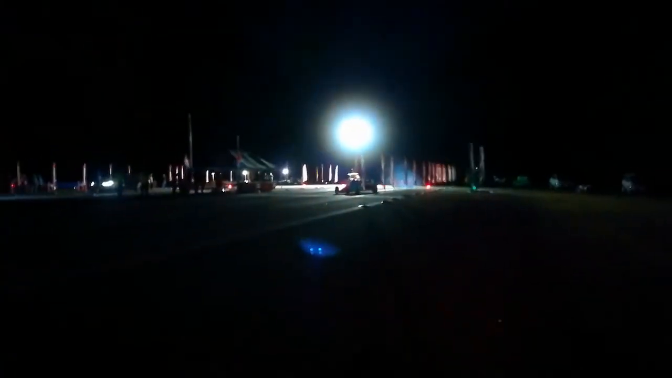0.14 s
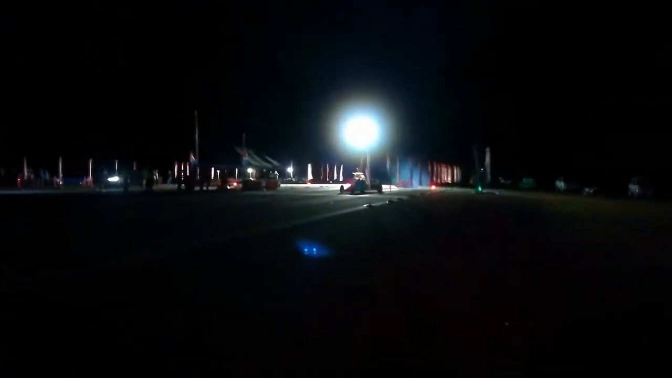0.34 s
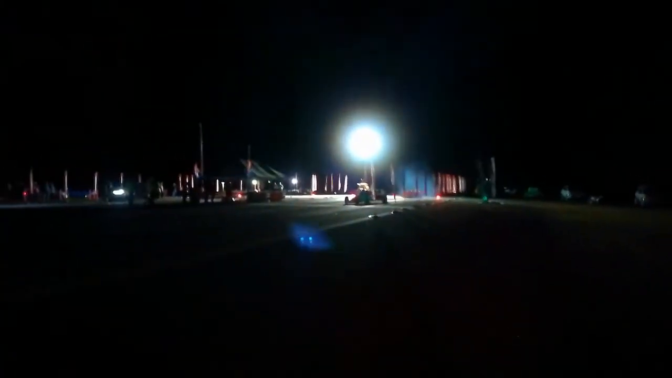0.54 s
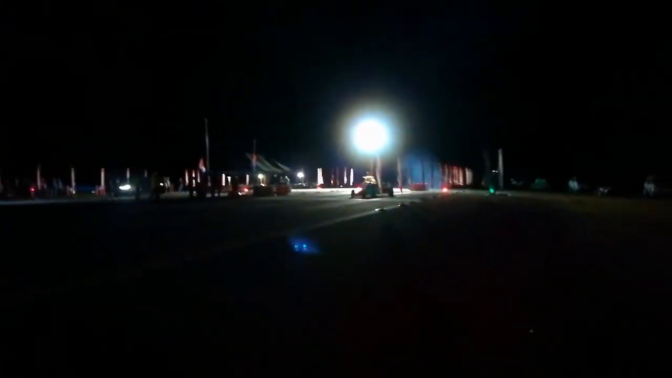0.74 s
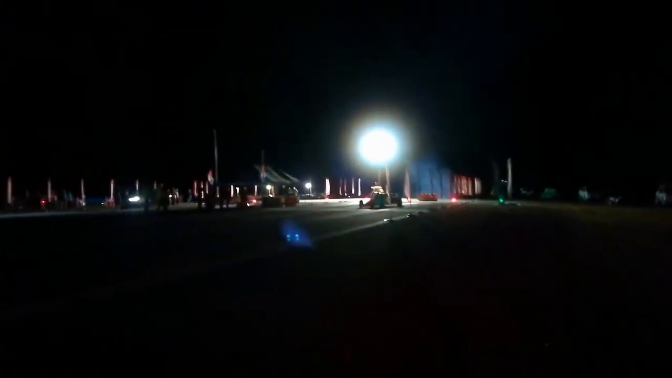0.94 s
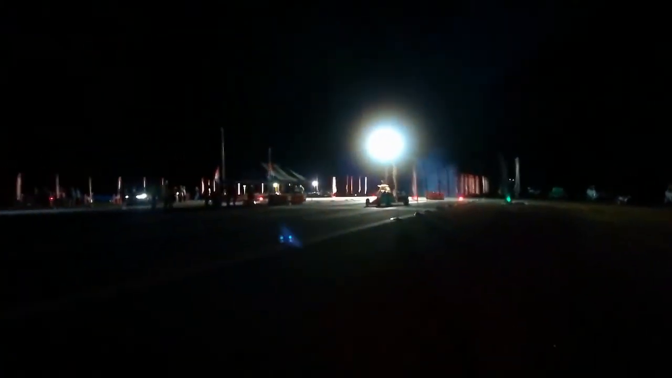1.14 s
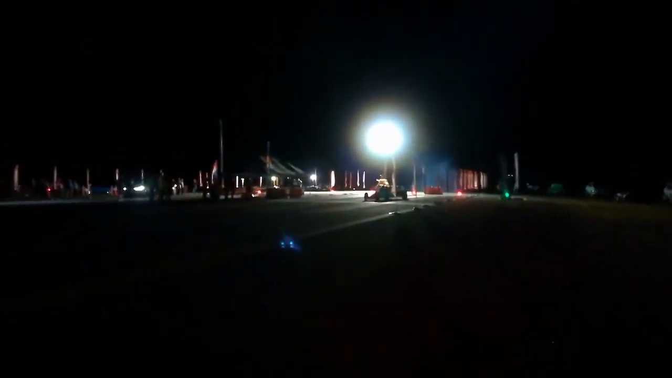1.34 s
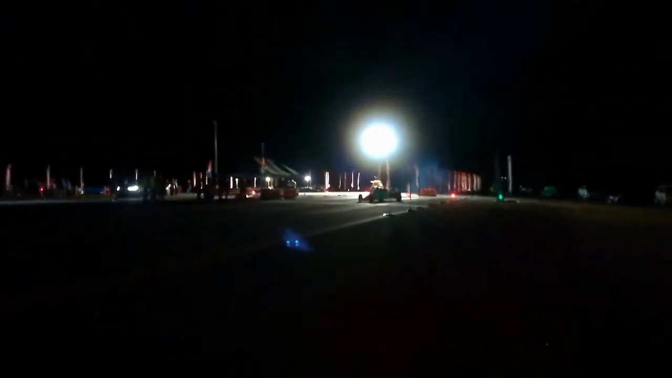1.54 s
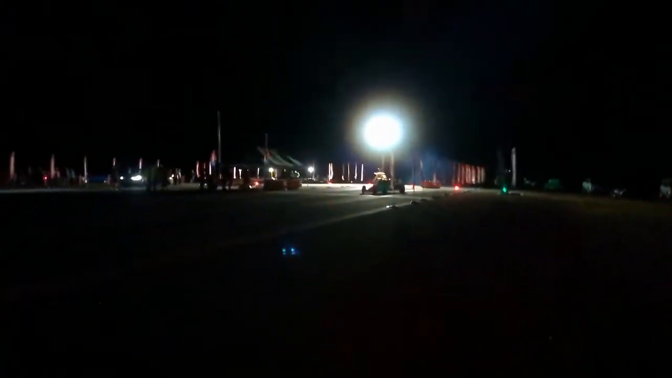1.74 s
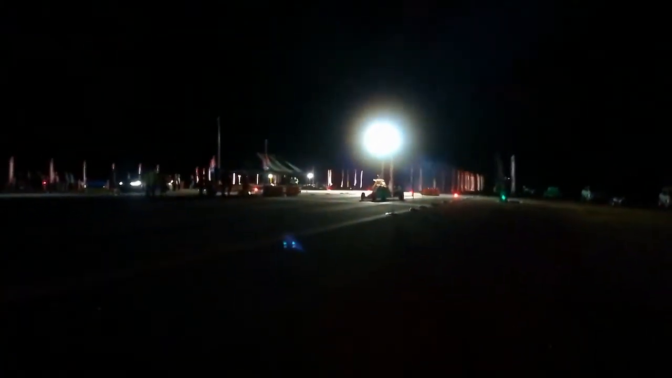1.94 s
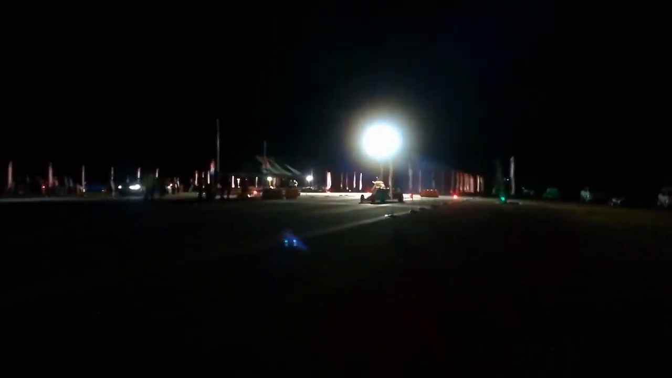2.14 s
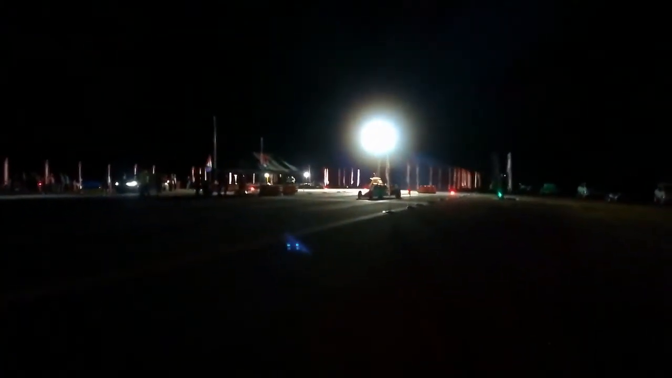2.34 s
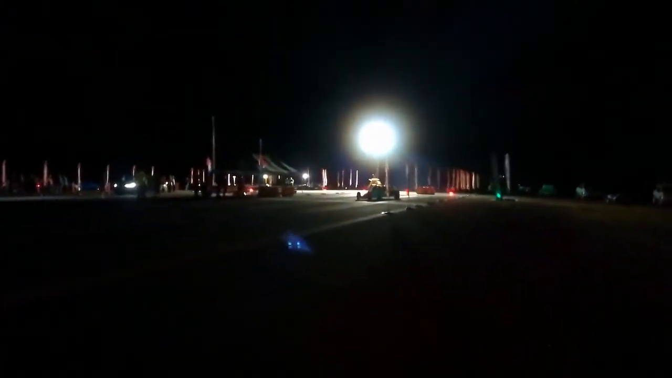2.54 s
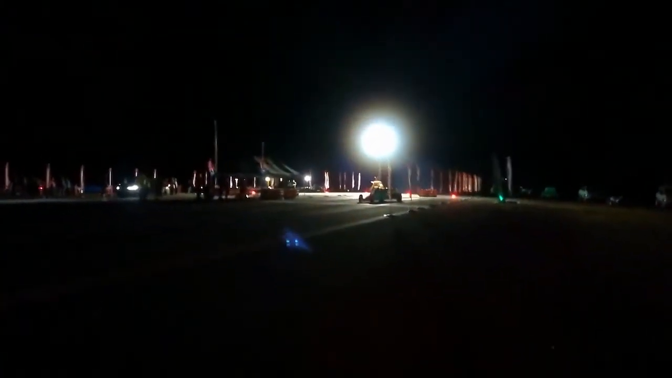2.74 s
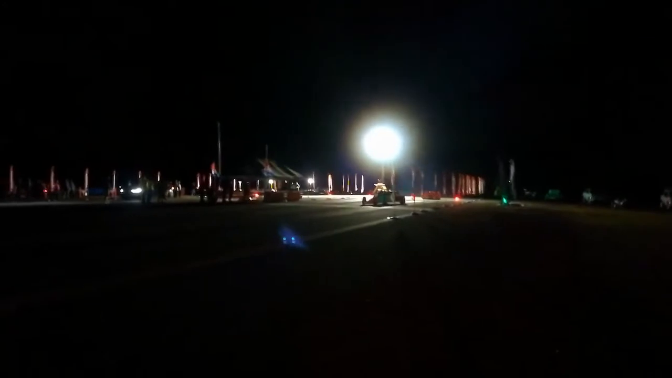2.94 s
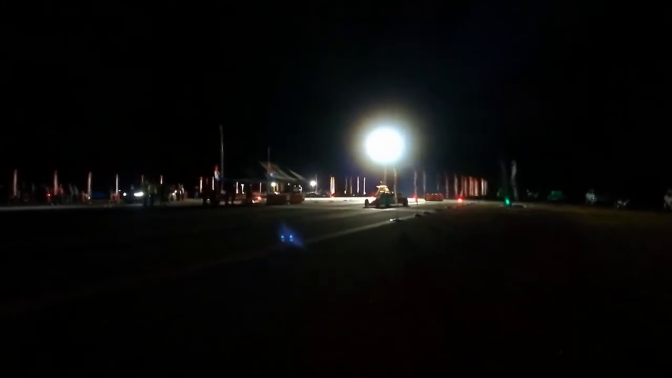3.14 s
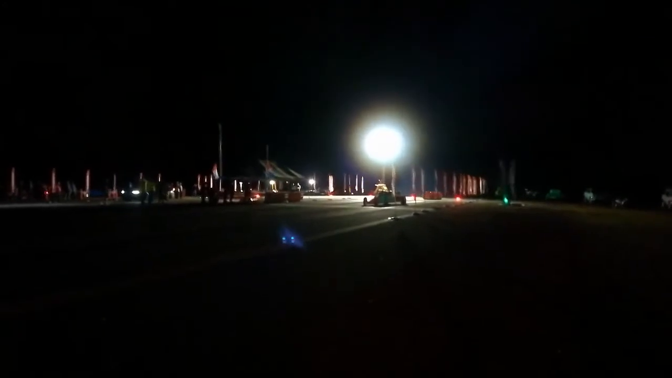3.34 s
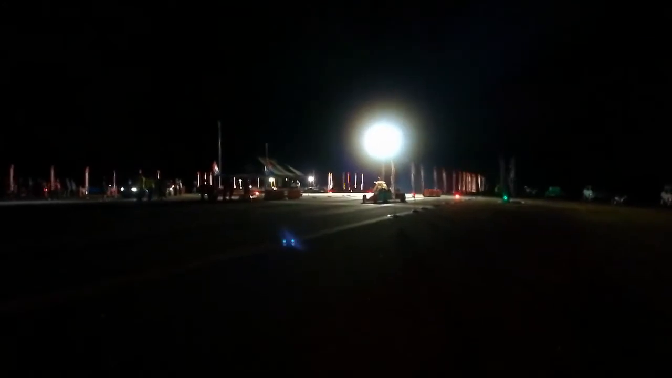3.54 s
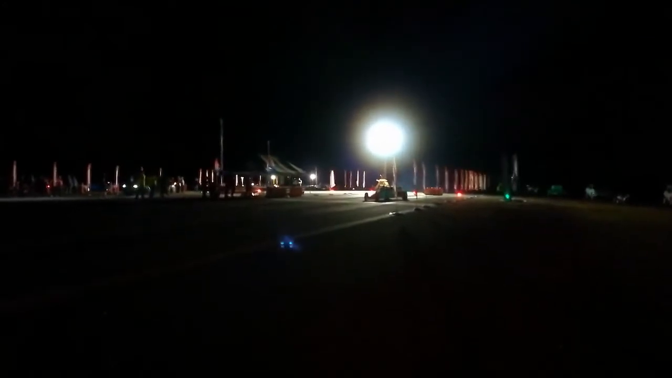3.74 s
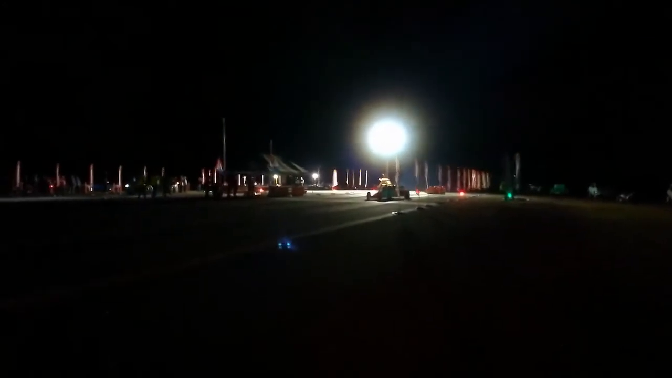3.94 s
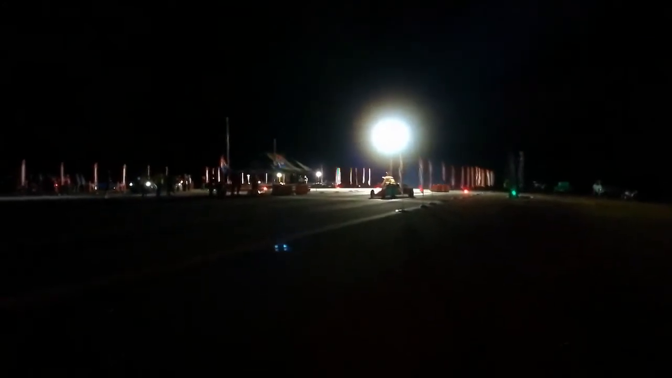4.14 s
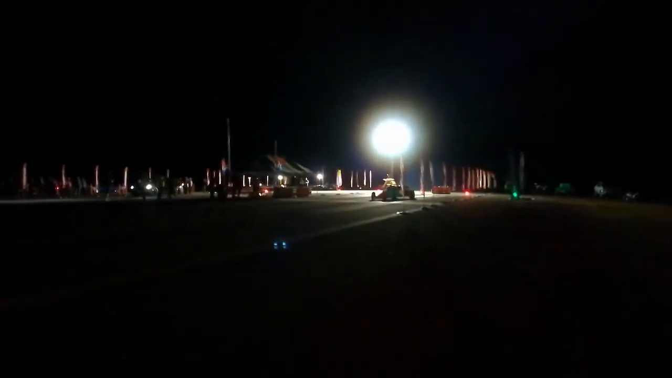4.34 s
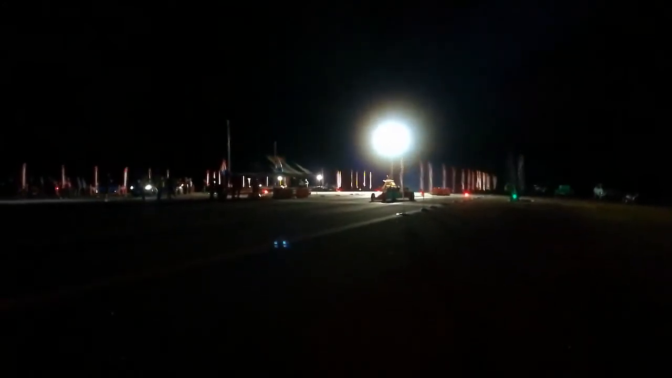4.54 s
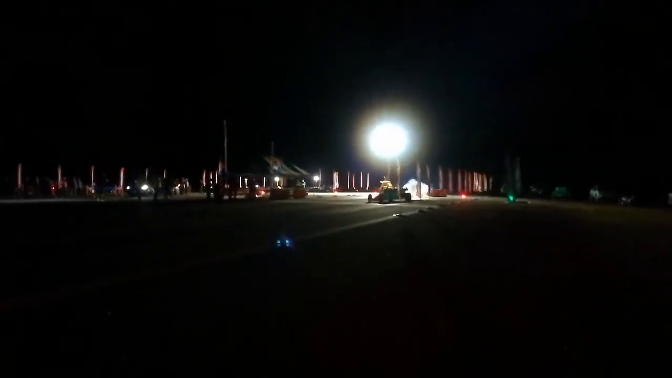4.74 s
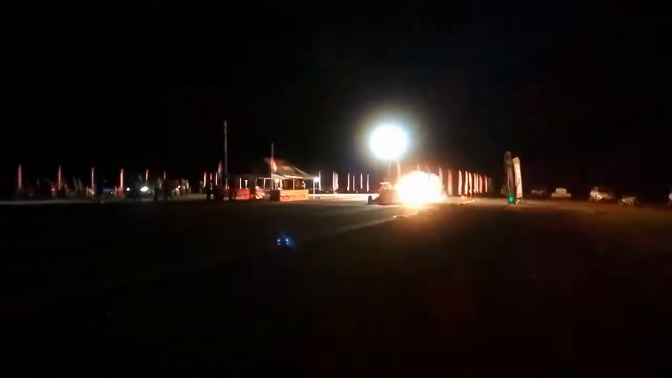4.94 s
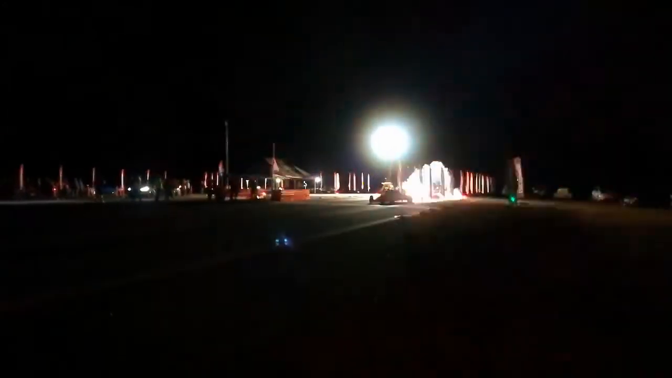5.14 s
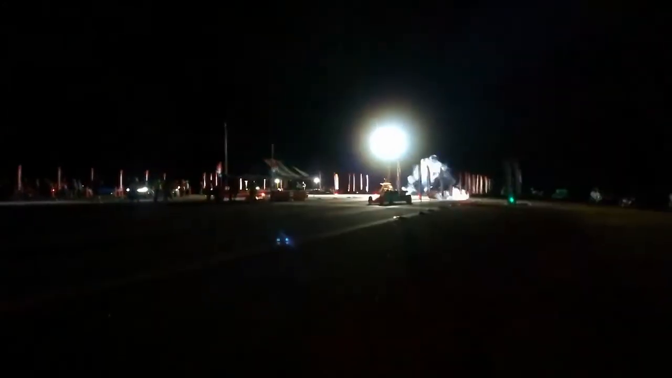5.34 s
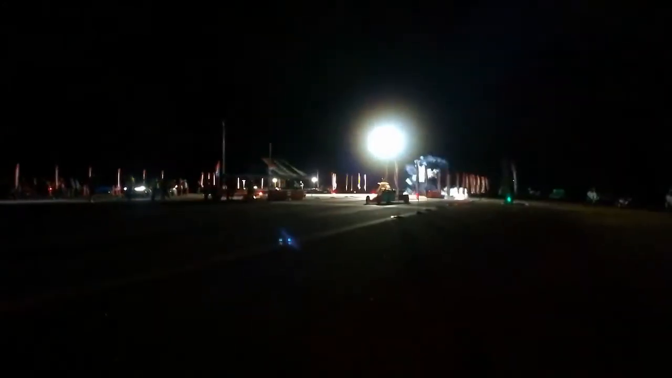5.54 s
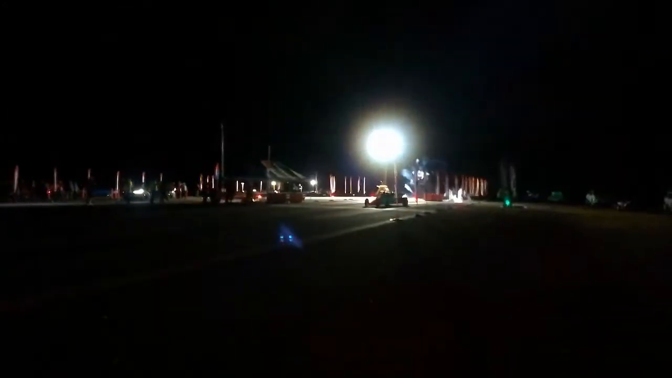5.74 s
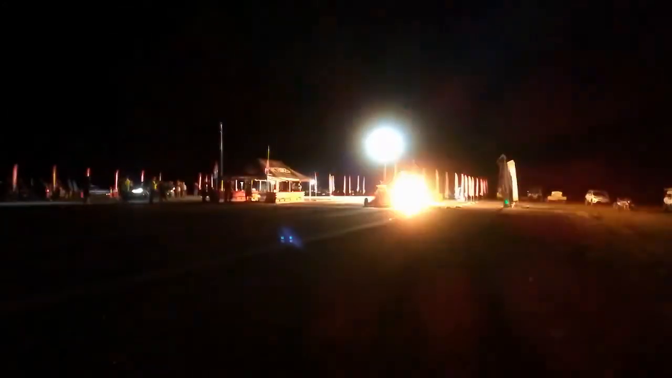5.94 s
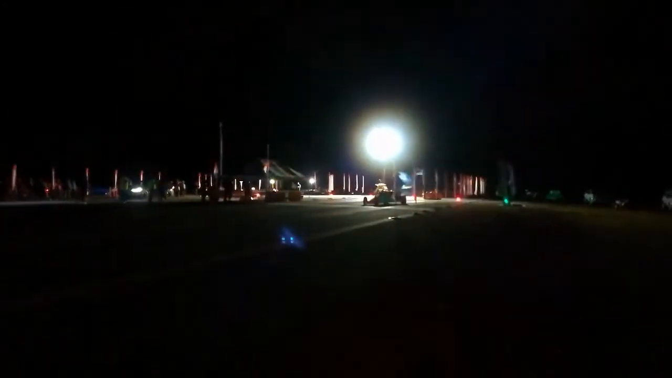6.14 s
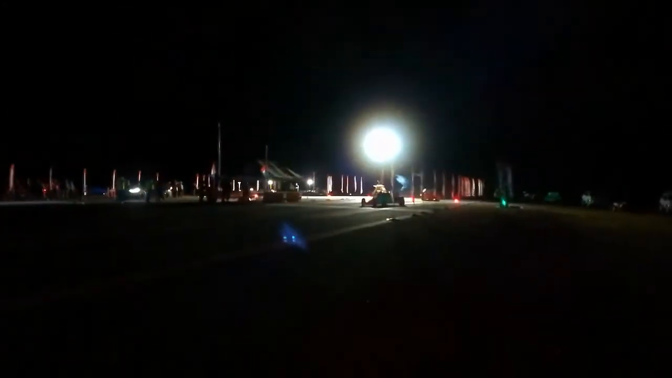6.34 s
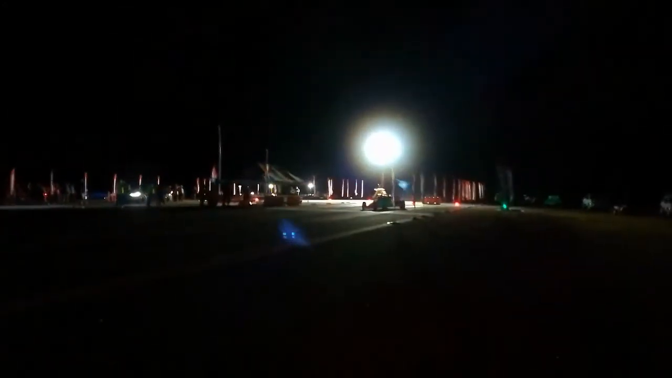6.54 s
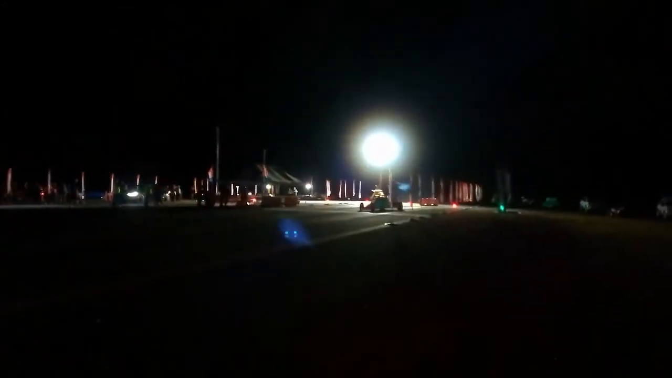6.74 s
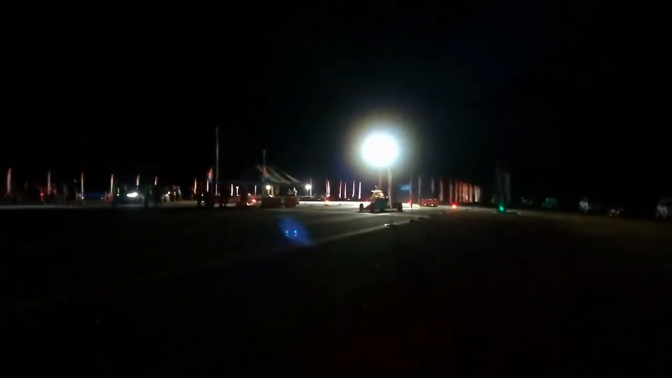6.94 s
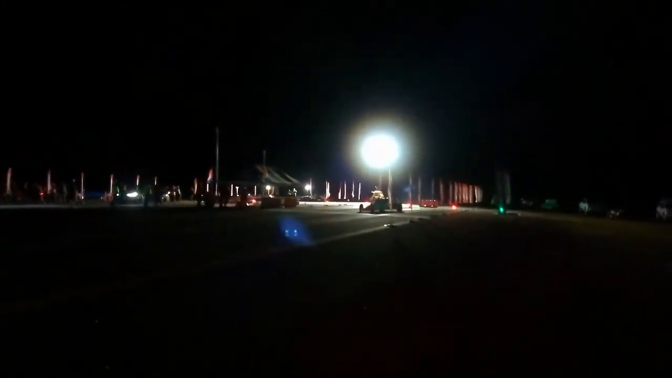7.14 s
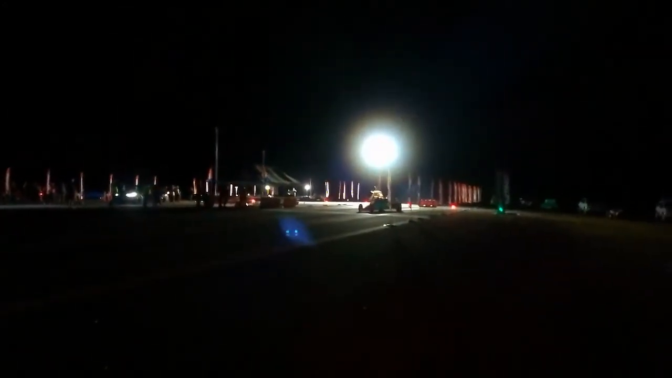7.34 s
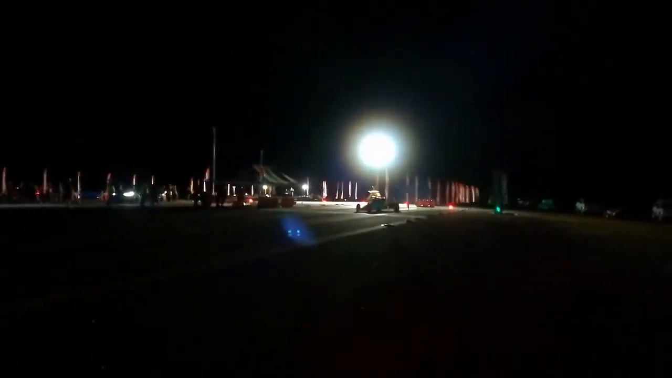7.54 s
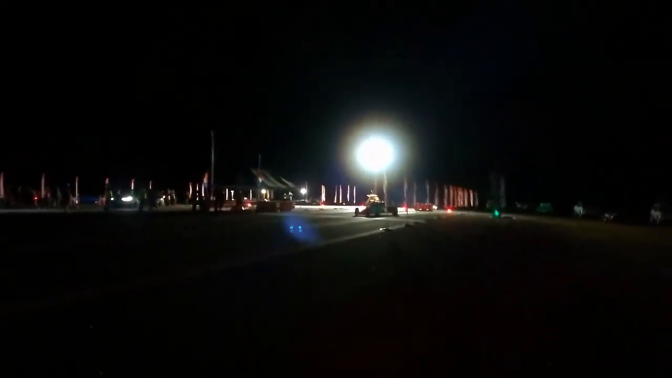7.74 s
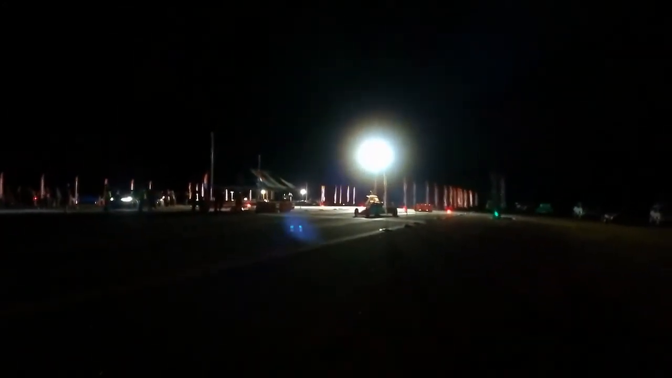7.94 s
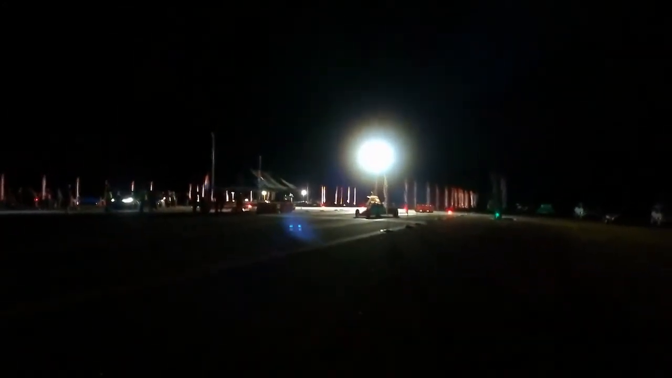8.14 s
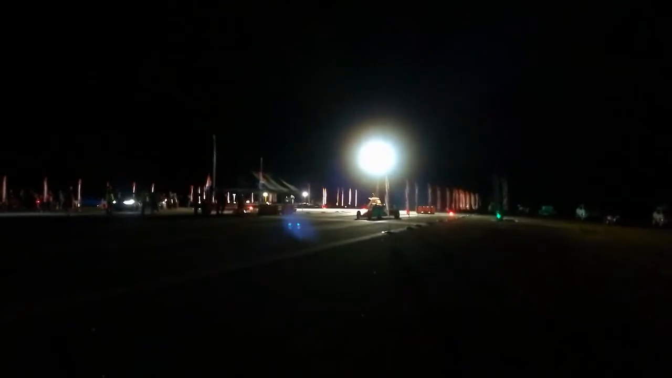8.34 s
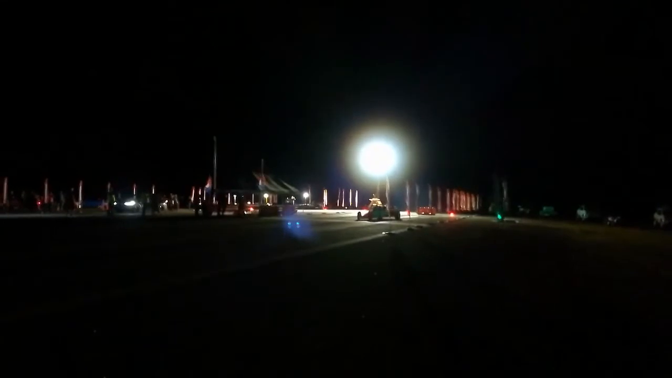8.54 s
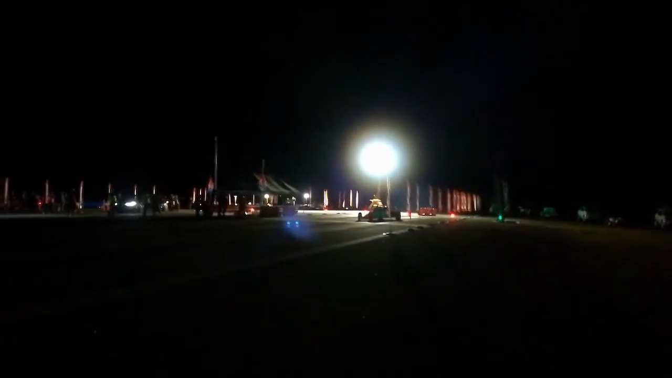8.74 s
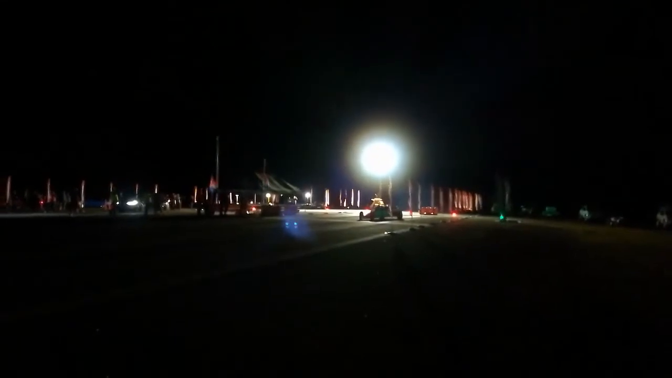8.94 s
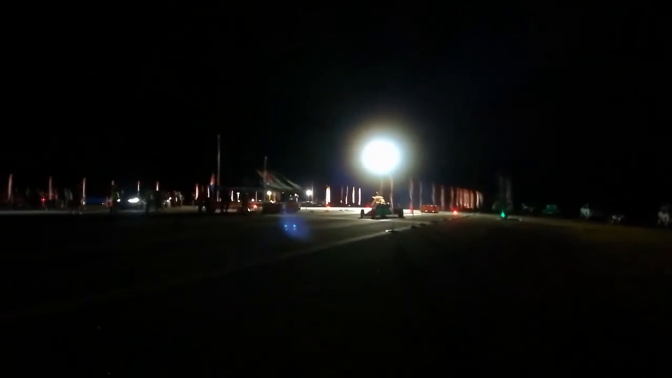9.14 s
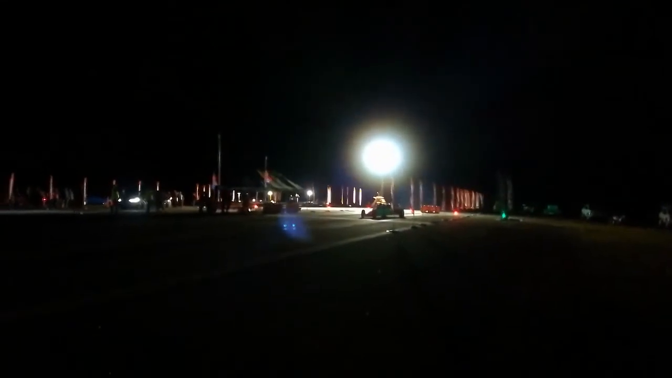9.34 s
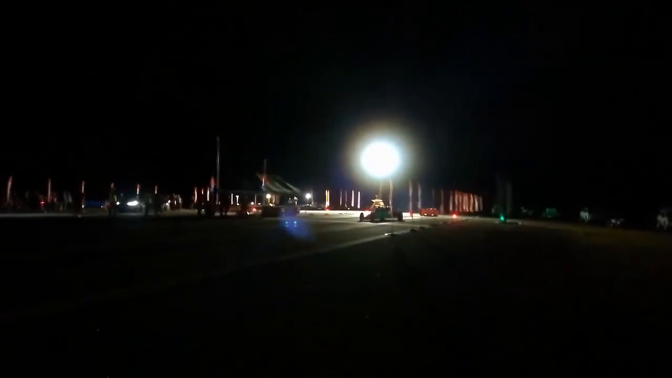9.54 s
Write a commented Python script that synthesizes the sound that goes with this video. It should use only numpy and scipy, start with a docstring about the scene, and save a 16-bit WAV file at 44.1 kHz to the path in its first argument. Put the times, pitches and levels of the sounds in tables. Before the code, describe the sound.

A jet-powered car idles throughout, heard from far off on an open drag strip. Its turbine makes a high, fluttering whine of several tones, with whistles coming and going over rushing air, hiss and a low exhaust rumble. From about 0.5 to 3 seconds the pitch creeps upward, then holds while the hiss swells. At 5 seconds the afterburner lights with a loud, ragged thump that briefly overloads the microphone, followed by a deep popping roar lasting a third of a second. A second, softer burst with pops comes at about 6 seconds. Each blast rolls away quickly and makes the whine dip slightly in pitch. The engine sounds a little quieter afterward. From 7 to nearly 9 seconds the whine climbs higher and regains its level, running on until the end, just short of 10 seconds.

```python
"""Turbine whine over intake rush, hiss and exhaust rumble: a jet car idles, far off on a night drag strip. The
throttle creeps up and down. Compressor blades sing on multiples of the shaft speed; intake swirl whistles near
certain speeds. Moving air makes the sound flicker. Twice the afterburner lights, burns and pops for about 0.3
s, and the shaft sags. The first shot opens with a ragged thump; the overall level ducks there and later
recovers."""
import sys
import numpy as np
from scipy import signal
from scipy.fft import rfft, irfft, next_fast_len
from scipy.io import wavfile
from scipy.ndimage import uniform_filter1d, map_coordinates

SR = 44100
rng = np.random.default_rng(int(sys.argv[2]) if len(sys.argv) > 2 else 0)


def int16_out(signal):
    """Quantize to a 16-bit WAV file."""
    q = np.round(np.clip(np.atleast_2d(signal).T, -1, 1) * 32767)
    wavfile.write(sys.argv[1], SR, q.astype(np.int16))


N = 427769
TIME_S = np.arange(N) / SR
IDLE_HZ, CRUISE_HZ = 113.96, 130  # shaft speeds

# throttle moves: start/s, length/s, shaft speed change/Hz
THROTTLE_MOVES = [(0.46, 0.84, 10.91), (1.36, 0.64, 2.22), (2.08, 0.77, 4.24), (3.32, 0.8, 0.94),
                  (3.82, 3.9, -1.52), (7.0, 0.63, 5.35), (7.87, 0.87, 7.29)]
# shaft speed grid of the three loudest blade rows: f/Hz
MAIN_SPEEDS_HZ = [114, 118, 123, 125, 127, 131, 132.3, 136.3, 140, 143.5]
# front, middle and rear rows on that grid: level/dB
FRONT_ROW_DB = [-31, -30, -37, -40, -29, -29, -28.5, -34, -46, -42]
MIDDLE_ROW_DB = [-39.5, -36, -36, -47, -39, -40.5, -37.5, -35.5, -34, -41]
REAR_ROW_DB = [-44, -40, -42, -32.5, -38, -36, -34, -35, -30, -28.5]
# shaft speed grid of the weaker blade tones: f/Hz
WEAK_SPEEDS_HZ = [114, 127, 132, 143]
# weaker blade tones: shaft multiple, then level/dB at each grid speed
WEAK_TONES = [(17, -43, -47.5, -50, -38.5), (23, -60, -57, -42, -48.5), (25, -43.5, -35.5, -41, -43),
              (28, -57, -52, -41, -41.5), (30, -60, -47, -43, -51), (31, -60, -52, -43, -45),
              (37, -56, -42, -41, -35.5), (40, -43, -40, -38.5, -56), (42, -43, -41, -49, -54),
              (45, -60, -48, -49, -42), (48, -59, -52, -49, -39.5), (51, -46, -35, -40, -52),
              (54, -38.5, -47, -46, -47), (59, -60, -56, -61, -43), (60, -56, -43, -59, -47)]
# whistles: best shaft speed/Hz, reach either side/Hz, f/Hz, glide/(Hz per shaft Hz), width/Hz, level/dB
INTAKE_WHISTLES = [(114, 5, 815, -0.5, 6.1, -44.5), (113.7, 6, 898, 1, 22, -41.5),
                   (125.9, 5.65, 1031, 12, 30, -38.5), (127.3, 2.9, 950, 11, 6, -47),
                   (132, 1.5, 1015, 20, 8, -47), (132.4, 1.3, 920, 8, 6, -50), (127, 2.8, 1335, 16, 8, -40),
                   (130.6, 1, 1398, 18, 8, -49), (131.5, 0.54, 1318, 10, 8, -47),
                   (133, 5.2, 1068, 2, 30, -43.5), (132.9, 8.6, 1200, 2, 45, -42.5),
                   (136.2, 2.3, 965, 9.5, 8, -48), (143.2, 4.2, 1075, 16.5, 6, -42),
                   (144.2, 7.3, 1392, 2, 12, -45), (143.4, 2.5, 1505, 12, 6, -47),
                   (114.4, 4, 5340, 41, 20, -36.5), (126.4, 1.9, 5885, 46, 24, -34.5),
                   (143.4, 5.8, 5270, 4, 80, -39.5)]
# flow noise spectra: f/Hz, relative level/dB
INTAKE_SPECTRUM = [(800, -23), (920, -6), (1060, 0), (1230, 1), (1455, -8.5), (1580, 2), (1740, 1.5),
                   (1890, -7), (2060, -0.5), (2290, -5), (2450, -14.5), (2630, 0.5), (2870, -11),
                   (3150, -18)]
HISS_SPECTRUM = [(2830, -23.5), (3030, -3), (3220, -1.5), (3550, -1.5), (3950, -1.5), (4350, -2.5),
                 (4570, -4.5), (4820, 3.5), (5020, -.5), (5240, 2.5), (5440, -1.5), (5880, 1.5),
                 (6200, -1.5), (8200, -1.5), (11200, -6.5), (11600, -13), (13100, -16)]
RUMBLE_SPECTRUM = [(22, -24), (45, -6), (70, -3.5), (115, 1), (180, 0), (280, -5), (340, -19), (420, -16.5),
                   (560, -10), (760, -6.5), (880, -12.5), (1000, -40)]
FLAME_SPECTRUM = [(15, -12), (35, -12), (65, -4.5), (120, -4.5), (175, -1.5), (260, -6), (350, -21),
                  (500, -21), (700, -23), (1100, -40), (2500, -65)]
# hiss swells, ducks at the first thump, later recovers: t/s, relative level/dB
HISS_ENVELOPE = [(0.0, -26), (0.55, -25), (0.85, -23), (1.15, -22.5), (1.4, -23.5), (1.7, -22.5),
                 (2.3, -23), (2.6, -25), (3.25, -26), (3.8, -22.5), (4.7, -18.5), (4.97, -20),
                 (5.05, -22.5), (5.6, -25.5), (6.1, -25.5), (6.7, -28.5), (7.5, -28.5), (8.0, -27),
                 (8.43, -24.5), (8.8, -27), (9.1, -25.5), (9.7, -24)]
# top octave of the hiss, exhaust rumble: t/s, relative level/dB
SIZZLE_ENVELOPE = [(0.0, -38), (0.02, -33.5), (0.73, -38.5), (1.21, -29.5), (1.97, -34.5), (2.11, -30.5),
                   (3.32, -33), (3.7, -27), (4.02, -30.5), (4.62, -24.5), (5.13, -32), (5.75, -33),
                   (6.56, -29), (6.67, -33), (7.53, -34), (8.43, -26.5), (8.89, -35), (9.7, -25.5)]
RUMBLE_ENVELOPE = [(0.0, -41.5), (0.7, -37.5), (2.5, -38.5), (4.9, -39.5), (6.5, -42.5), (8.3, -41),
                   (9.7, -42.5)]
# afterburner shots: valve opens/s, flame lights/s, length/s, level/dB, shaft sag/Hz
BURNER_SHOTS = [(4.828, 4.983, 0.31, -19, 2.67), (5.851, 5.932, 0.24, -20, 3.15)]
# one ragged ignition thump (first four rows), then single pops: t/s, peak/dB, f/Hz, cycles
PRESSURE_PULSES = [(5.0017, 1.5, 119, 1.25), (5.008, -7, 176, 1.6), (5.0147, 3, 119, 1.2),
                   (5.0194, -2, 164, 1.8), (5.12, -16, 150, 4.4), (5.176, -6, 100, 1.1),
                   (5.253, -12.5, 185, 4.5), (5.288, -12, 115, 1.3), (6.01, -9, 155, 3.5),
                   (6.037, -11, 135, 2), (6.154, -12, 105, 1.6)]
# two microphone ports: f/Hz, left minus right/dB, coherence (0-1), left lead/rad
MIC_PORTS = [(130, 0, 1, 0), (230, 0, .997, 0), (420, 3.5, .75, .1), (650, -5.5, .85, -.2),
             (880, 7, .35, 1.6), (1100, 0, .98, -.1), (1280, .5, .96, 0), (1450, 4, .25, .3),
             (1750, .4, .97, -.1), (2280, 1.5, .6, 0), (2440, 0, .4, -2.8), (2630, -2, .7, -1.9),
             (2930, -6, .35, -1.1), (3600, -1, .6, -.7), (4800, -2, .65, -.3), (7000, -1.2, .67, .1),
             (8400, -2.5, .4, 1.6), (9800, -15, .15, 2.3), (11200, -14, .12, 2.7), (12200, -9, .15, 3)]


def undb(db):
    """Decibels to gain."""
    return 10 ** (np.asarray(db) / 20)


def envelope_db(rows):
    """A (t/s, level/dB) table at every sample."""
    return np.interp(TIME_S, *np.transpose(rows))


def over_pitch(rows, hz):
    """Columns of an (f/Hz, ...) table at hz, on a log axis."""
    grid_hz, *columns = np.transpose(rows)
    return [np.interp(np.log(np.maximum(hz, 1)), np.log(grid_hz), c) for c in columns]


def ease(start_s, length_s):
    """Half-cosine step from 0 to 1."""
    return .5 - .5 * np.cos(np.pi * np.clip((TIME_S - start_s) / length_s, 0, 1))


def walk(rate_hz, hop=1):
    """Smoothed random steps, spread 1, one value per hop samples."""
    hold = max(int(SR / rate_hz / hop), 1)
    step = np.minimum(np.arange(0, N, hop) // (hold * hop), N // 20 - 1)
    held = rng.standard_normal(N // 20)[step]
    smooth = uniform_filter1d(uniform_filter1d(held, hold), hold)
    return smooth / smooth.std()


def wander(rate_hz, hop):
    """Complex random amplitude, rms near 1."""
    return (walk(rate_hz, hop) + 1j * walk(rate_hz, hop)) / np.sqrt(2)


def split(x, hz):
    """Bands below and above hz."""
    low = signal.sosfiltfilt(signal.butter(4, hz, fs=SR, output="sos"), x)
    return low, x - low


def at_ports(hz, common, apart):
    """Left and right amplitudes: the microphone housing shades, delays and scatters the sound."""
    tilt_db, coherence, lead_rad = over_pitch(MIC_PORTS, hz)
    mid = common * np.sqrt((1 + coherence) / 2)
    side = apart * np.sqrt((1 - coherence) / 2)
    ratio = undb(tilt_db)
    left, right = (mid + side) * ratio, (mid - side) * np.exp(-1j * lead_rad)
    return np.array([left, right]) * np.sqrt(2 / (1 + ratio ** 2))


def shaft(sag_s=.21, recover_s=.6):
    """Shaft speed in Hz: follows the throttle, sags and recovers at each afterburner shot."""
    shaft_hz = IDLE_HZ + sum(hz * ease(start_s, length_s) for start_s, length_s, hz in THROTTLE_MOVES)
    for opens_s, _, _, _, sag_hz in BURNER_SHOTS:
        shaft_hz -= sag_hz * (ease(opens_s, sag_s) - ease(opens_s + sag_s, recover_s))
    return shaft_hz


def tone(hz, scatter, rate_hz, hop=32):
    """Gliding stereo tone: a steady part plus a part scattered by the air."""
    slow = at_ports(hz[::hop], 1 + scatter * wander(rate_hz, hop), scatter * wander(rate_hz, hop))
    amplitude = uniform_filter1d(np.repeat(slow, hop, axis=1)[:, :N], hop)
    carrier = np.exp(2j * np.pi * np.cumsum(hz) / SR)
    return np.real(amplitude * carrier) * np.sqrt(2 / (1 + scatter ** 2))


def compressor(shaft_hz, swell_db, front_blades=20, middle_blades=34, rear_blades=57):
    """Blade rows sing on shaft multiples; speed sets which stand out, the air makes them flutter."""
    front_db = np.interp(shaft_hz, MAIN_SPEEDS_HZ, FRONT_ROW_DB) + 0.86 * swell_db + 0.6 * walk(12)
    middle_db = np.interp(shaft_hz, MAIN_SPEEDS_HZ, MIDDLE_ROW_DB) + 0.73 * swell_db
    rear_db = np.interp(shaft_hz, MAIN_SPEEDS_HZ, REAR_ROW_DB) + swell_db + 2.2 * walk(5)
    whine = undb(front_db) * tone(front_blades * shaft_hz, scatter=0.24, rate_hz=45)
    whine += undb(middle_db) * tone(middle_blades * shaft_hz, scatter=0.3, rate_hz=25)
    whine += undb(rear_db) * tone(rear_blades * shaft_hz, scatter=0.3, rate_hz=30)
    for multiple, *levels_db in WEAK_TONES:
        level_db = np.interp(shaft_hz, WEAK_SPEEDS_HZ, levels_db) + 0.93 * swell_db
        whine += undb(level_db) * tone(multiple * shaft_hz, scatter=0.58, rate_hz=26)
    return whine


def whistles(shaft_hz, swell_db, waver=.0015, half_noise_width_hz=15):
    """Intake swirl locks into whistles near certain shaft speeds; each glides at its own rate."""
    out = 0
    for best_hz, reach_hz, hz, glide, width_hz, level_db in INTAKE_WHISTLES:
        offset_hz = shaft_hz - best_hz
        lock = np.exp(-.5 * (offset_hz / reach_hz) ** 4)
        pitch_hz = (hz + glide * offset_hz) * (1 + waver * walk(4))
        whistle = tone(pitch_hz, scatter=width_hz / half_noise_width_hz, rate_hz=2 * width_hz)
        out += undb(level_db + 0.39 * swell_db) * lock * whistle
    return out


def turbulence(spectrum, flicker_db, flicker_hz, patch_hz, frame=1024):
    """Stereo flow noise, rms 1; moving air makes patches of its spectrum flicker."""
    length = next_fast_len(N)
    hz = np.arange(length // 2 + 1) * SR / length
    corner_hz = 2 * spectrum[-1][0]
    gain = undb(over_pitch(spectrum, hz)[0]) / (1 + (hz / corner_hz) ** 8)
    common, apart = rfft(rng.standard_normal((2, length)))
    noise = irfft(at_ports(hz, common, apart) * gain, length)[:, :N]
    bins_hz, times_s, frames = signal.stft(noise, SR, nperseg=frame)
    grid = np.meshgrid(bins_hz / patch_hz, times_s * flicker_hz, indexing="ij")
    patches = map_coordinates(rng.standard_normal((128, 256)), grid, order=1, mode="wrap")
    noise = signal.istft(frames * undb(flicker_db * patches), SR, nperseg=frame)[1][:, :N]
    return noise / noise.std()


def ground_reflection(x, lag_s, share, drift):
    """Adds a grazing reflection, late and inverted; the breeze shifts the resulting comb."""
    delayed_index = np.arange(N) - SR * lag_s * (1 + drift * walk(2.58))
    reflected = np.array([map_coordinates(channel, [delayed_index], order=3) for channel in x])
    return (x - share * reflected) / np.sqrt(1 + share ** 2)


def airflow(shaft_hz, swell_db, hiss_db):
    """Intake rush and hiss; the top octave fades and returns separately with the breeze."""
    rush = turbulence(INTAKE_SPECTRUM, flicker_db=1.5, flicker_hz=9, patch_hz=151)
    rush_db = -31.5 + 0.6 * swell_db - 0.067 * (shaft_hz - CRUISE_HZ) + 0.22 * walk(8)
    jet = turbulence(HISS_SPECTRUM, flicker_db=2.9, flicker_hz=11, patch_hz=140)
    jet = ground_reflection(jet, lag_s=.00206, share=0.21, drift=0.013)
    hiss, sizzle = split(jet, hz=9000)
    hiss *= undb(hiss_db + 1.3 + 0.5 * walk(24))
    sizzle *= undb(envelope_db(SIZZLE_ENVELOPE) + 11 + 0.51 * walk(22))
    return rush * undb(rush_db) + hiss + sizzle


def exhaust(shaft_hz, swell_db):
    """The idling jet rumbles; its roar grows during spool-up and thins at higher shaft speed."""
    spool_hz_per_s = np.maximum(np.gradient(shaft_hz, TIME_S), 0)
    roar_db = -39.5 + 0.28 * swell_db - 0.24 * (shaft_hz - CRUISE_HZ) + 0.078 * spool_hz_per_s
    flow = turbulence(RUMBLE_SPECTRUM, flicker_db=1.3, flicker_hz=7, patch_hz=158)
    rumble, roar = split(flow, hz=540)
    return rumble * undb(envelope_db(RUMBLE_ENVELOPE)) + roar * undb(roar_db)


def afterburner(light_s=.016, cut_s=.021, roll_db=-10, roll_t60_s=.75):
    """Raw fuel burns with a deep roar that cuts off and rolls away over the strip."""
    gain = 0
    for _, lights_s, length_s, level_db, _ in BURNER_SHOTS:
        ends_s = lights_s + length_s
        lit, gone = ease(lights_s, light_s), ease(ends_s, cut_s)
        roll = undb(roll_db - 60 * np.maximum(TIME_S - ends_s, 0) / roll_t60_s)
        gain += undb(level_db) * (lit - gone + gone * roll)
    return gain * turbulence(FLAME_SPECTRUM, flicker_db=1.5, flicker_hz=24, patch_hz=200)


def pulse(centre_s, hz, cycles=1.2):
    """Pressure pulse: a cosine under a Gaussian window."""
    turns = hz * (TIME_S - centre_s)
    return np.cos(2 * np.pi * turns) * np.exp(-(2 * turns / cycles) ** 2)


def thump_and_pops(slow_wave_hz=36):
    """One ignition thump of four pulses, then pops; each pulse adds a slow wave, as its peak squared."""
    out = 0
    for centre_s, peak_db, hz, cycles in PRESSURE_PULSES:
        out += undb(peak_db) * pulse(centre_s, hz, cycles)
        out += undb(2 * peak_db - 17.5) * pulse(centre_s, slow_wave_hz)
    return out


def scene(sway_db=0.06):
    """One engine: whine, whistles, rush and exhaust roar follow the shaft and the hiss level."""
    shaft_hz = shaft()
    hiss_db = envelope_db(HISS_ENVELOPE)
    swell_db = hiss_db - hiss_db.mean()
    turbine = compressor(shaft_hz, swell_db) + whistles(shaft_hz, swell_db)
    turbine += airflow(shaft_hz, swell_db, hiss_db)
    balance = undb(np.array([[1], [-1]]) * sway_db * walk(3.23) / 2)
    return turbine * balance + exhaust(shaft_hz, swell_db) + afterburner() + thump_and_pops()


def record(dry, top_hz=13150):
    """Overload clips the first thump; a steep low-pass cuts the top."""
    lowpass = signal.ellip(12, .2, 70, top_hz, fs=SR, output="sos")
    return signal.sosfilt(lowpass, np.clip(dry, -1, 1))


dry = scene()
out = record(dry)
int16_out(out)
```